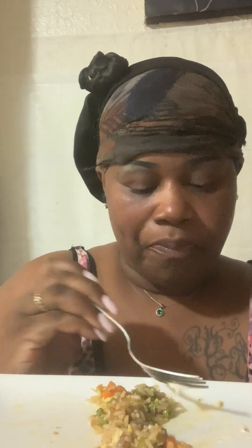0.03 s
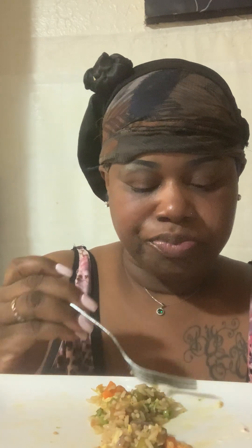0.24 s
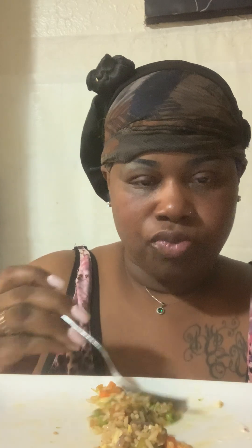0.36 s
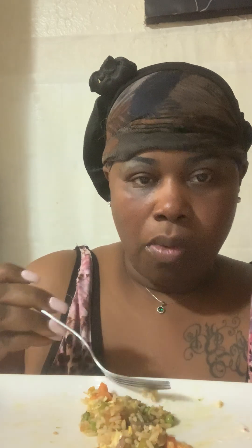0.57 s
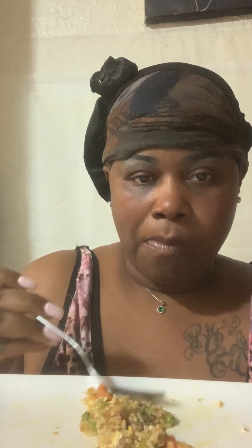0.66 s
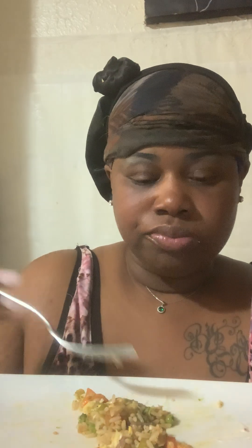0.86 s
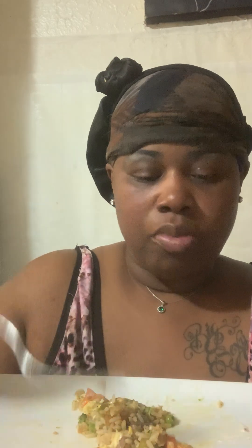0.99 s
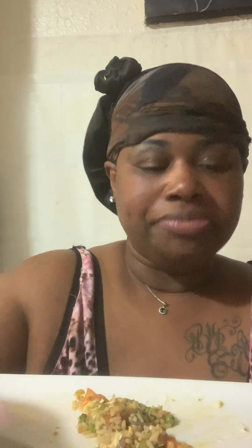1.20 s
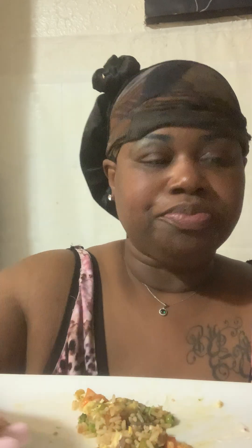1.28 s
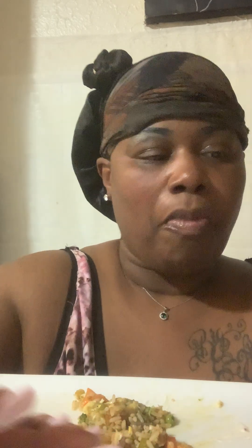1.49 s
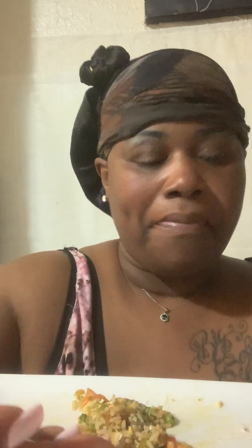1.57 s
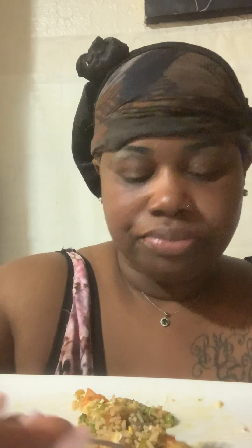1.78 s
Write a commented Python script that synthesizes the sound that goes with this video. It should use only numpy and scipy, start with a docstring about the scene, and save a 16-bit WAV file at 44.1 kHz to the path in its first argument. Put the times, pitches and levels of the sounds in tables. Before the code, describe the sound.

Metal fork clinks sharply twice on a china plate, then scrapes lightly, in a small room

```python
"""A small room: a metal fork clinks on a china plate and pushes rice about, close to a stereo microphone.
Two dull bumps sound further off; then the fork scrapes lightly over the plate. A low hum lies underneath.
Clinks are decaying sine modes with a noise crack, the scrape is random slips through resonances,
rice is dense random grains, the bumps are decaying noise and modes; a short noise tail makes the room."""
import sys
import numpy as np
from scipy import signal
from scipy.fft import rfft, irfft
from scipy.io import wavfile
from scipy.ndimage import uniform_filter1d, minimum_filter1d

SR = 44100
rng = np.random.default_rng(int(sys.argv[2]) if len(sys.argv) > 2 else 0)


def dump_mix(stems):
    """Bounce the given channels to the path in sys.argv[1] as a 16-bit WAV at rate SR."""
    frames = np.atleast_2d(stems).T  # one column per channel
    limited = np.clip(frames, -1, 1)  # hard clip at full scale
    pcm = np.round(limited * 32767).astype(np.int16)
    wavfile.write(sys.argv[1], SR, pcm)


N = 81585
T = np.arange(N) / SR  # time in seconds
HZ = np.fft.rfftfreq(N, 1 / SR)  # frequency of each spectrum bin


def amp(db):
    """Decibels to gain."""
    return 10 ** (np.asarray(db) / 20)


def unit(x):
    """Scales to rms 1."""
    return x / np.sqrt(np.mean(x ** 2) + 1e-20)


def read(points, hz):
    """Reads a table on a log-frequency axis."""
    f, value = np.transpose(points)
    return np.interp(np.log(hz + 1), np.log(f + 1), value)


def level(rows, axis):
    """One dB column of a time table as a gain curve."""
    rows = np.array(rows)
    return amp(np.interp(T, rows[:, 0], rows[:, axis]))


def add(mix, s, sound):
    """Mixes a sound in at time s."""
    part = mix[:, round(s * SR):]
    part += sound[:, :part.shape[1]]


def colour(x, db):
    """Gives two unrelated signals a spectrum and the likeness of the two microphone channels."""
    mono_below_hz = 150
    # How alike the two channels are. Each row: frequency in Hz, left-right coherence (-1 to 1).
    likeness = [(200, .999), (300, 0.95), (420, 1), (640, -0.044), (1400, -0.11), (3100, -0.28),
                (7000, -0.034), (15000, -.7)]
    a, b = rfft(x)
    same = np.where(HZ < mono_below_hz, 1, np.clip(read(likeness, HZ), -1, 1))
    mid = a * np.sqrt(1 + same)
    side = b * np.sqrt(1 - same)
    left_right = np.array([mid + side, mid - side])
    return unit(irfft(left_right * amp(db), N))


def noise(db):
    """Stereo noise with a given spectrum."""
    return colour(rng.standard_normal((2, N)), db)


def burst(spectrum, db, t60):
    """A noise burst: a quick linear rise under an exponential decay."""
    rise_s = 0.0023
    return amp(db - 60 * T / t60) * np.minimum(T / rise_s, 1) * noise(read(spectrum, HZ))


def grains(rate, spread_db):
    """Random tiny clicks of uneven size, at a mean rate per second."""
    size = amp(spread_db * np.minimum(rng.exponential(1, N), 4))
    struck = rng.random(N) < rate / SR
    return size * struck * rng.standard_normal((2, N))


def die_away(x, t60, hold=0):
    """Lets each band decay at its own speed, after an optional hold in seconds."""
    hz, t, z = signal.stft(x, SR, nperseg=256)
    decay = amp(-60 * np.maximum(t - hold, 0) / read(t60, hz)[:, None])
    return signal.istft(z * decay, SR, nperseg=256)[1][:, :N]


def ring(modes):
    """Half a second of decaying modes, each reaching the two microphones with its own phase."""
    swell_cycles = 2.95  # each mode builds up over about this many of its own cycles
    t, sides = T[:SR // 2], np.array([[.5], [-.5]])
    out = np.zeros((2, len(t)))
    for hz, db, t60, lead in modes:
        envelope = amp(db - 60 * t / t60) * (1 - np.exp(-t * hz / swell_cycles))
        out += envelope * np.sin(2 * np.pi * hz * t + sides * lead)
    return np.pad(out, ((0, 0), (0, N - len(t))))


def resonate(x, peaks):
    """Passes x through a bank of steep resonances, each levelled before the sum."""
    z = rfft(x)
    out = np.zeros((2, N))
    for hz, width, db in peaks:
        out += amp(db) * unit(irfft(z / (1 + 1j * (HZ - hz) / width) ** 2, N))
    return unit(out)


def clinks():
    """Each blow cracks and sets plate, fork and table ringing; some sounds are faint and rise more slowly."""
    # Fork meets plate. Each row: start in seconds, gain of the plate's low modes in dB, of its high modes
    # in dB, of the fork's ring in dB, of the crack in dB, rise of the sound in seconds.
    blows = [(.238, -37, -29.5, -59, -22.5, 0.004), (0.2488, -4.5, -8, -24.5, -19, 0.00021),
             (.3152, -13, -24, -27, -39.5, .0006), (.588, -45, -30, -52, -20.5, 0.0074),
             (0.5989, -5, -9, -36, -15.5, .0004), (.6360, -13.5, -48, -62, -35, 0.0031),
             (0.689, -46, -39, -62, -66, 0.0011)]
    # Plate modes. Each row: frequency in Hz, level in dB, t60 in seconds, phase lead of the left in radians.
    plate_modes = [(857.6, -8.5, 0.062, .2), (947.6, -14, 0.12, -2), (1050, -11, 0.071, 4),
                   (2015, -20, 0.21, 2.5), (2101, 3.5, 0.11, 0.98), (2240, -23, .06, 14.4),
                   (2582, -23.5, .07, 5), (2736, -11.5, .14, 3.5), (2853, -6, 0.033, -3),
                   (3564, -23.5, 0.2, -10.5), (3530, -25, 0.1, 0), (3854, -2.5, 0.14, 0.94),
                   (4470, -14.5, .13, -3), (5800, -31, .17, 0), (6238, -22, .1, 1.2), (6735, -23, .14, 2.3),
                   ]
    # Fork modes. Each row: frequency in Hz, level in dB, t60 in seconds, phase lead of the left in radians.
    fork_modes = [(5360, -12.5, 0.28, 3.5), (6728, -13, 0.21, -2), (7974, -4.5, 0.13, -0.2),
                  (8640, -15, 0.19, -6), (9317, -3, 0.13, 0.94), (10910, -11, 0.12, -1.5),
                  (11800, -10, .13, -2.5), (12650, -25.5, .13, -6), (13000, -22, .12, -6.5)]
    # Spectrum of the crack. Each row: frequency in Hz, level in dB.
    crack_spectrum = [(100, -33.5), (250, -28), (600, -10.5), (1500, -9), (2200, -2), (3400, -3),
                      (4200, -14), (4900, -16.5), (6300, -15), (9500, -27.5), (13000, -29), (15500, -51.5)]
    crack_t60, low_modes, low_rise_s = 0.068, 3, 0.0056
    free_share, choke_s = 0.75, 0.0069
    out = np.zeros((2, N))
    fork = ring(fork_modes)
    table = ring([(223, -33, 0.2, 0)])  # the table thuds under the plate
    low = (ring(plate_modes[:low_modes]) + table) * np.minimum(T / low_rise_s, 1)
    # the touching fork damps the plate: the gain of its high modes soon falls from 1.75 to 0.75
    high = ring(plate_modes[low_modes:]) * (free_share + np.exp(-(T / choke_s) ** 2))
    for s, low_db, high_db, fork_db, crack_db, rise_s in blows:
        blow = amp(low_db) * low + amp(high_db) * high + amp(fork_db) * fork
        blow += burst(crack_spectrum, crack_db, crack_t60)
        add(out, s, blow * np.minimum(T / rise_s, 1))
    return out


def chatter():
    """Uneven pressure on the tines: a random flutter of level, mostly below 60 Hz."""
    flutter_hz, depth_db = 60, 0.36  # rms depth
    flutter = irfft(rfft(rng.standard_normal(N)) * np.exp(-(HZ / flutter_hz) ** 2), N)
    return amp(depth_db * unit(flutter))


def scrape():
    """Fine slips of the tines sing in the plate; now and then a tine catches."""
    # Fork sliding on the plate. Each row: time in seconds, ring in dB, hiss in dB, both before the trim.
    slide = [(1.405, -62, -87), (1.424, -53, -52.5), (1.48, -45, -49.5), (1.515, -45.5, -59),
             (1.542, -43.5, -60.5), (1.575, -53.5, -74), (1.615, -45, -58), (1.636, -40, -55),
             (1.665, -39, -56), (1.685, -37, -44), (1.71, -49.5, -74), (1.745, -48.5, -67),
             (1.79, -41, -49.5), (1.822, -50, -66), (1.85, -51.5, -51)]
    # Ringing resonances. Each row: frequency in Hz, width in Hz, level in dB.
    low_peaks = [(596, 64, -20), (921, 92, -17.5), (1392, 49, -12.5), (2101.6, 38, 2), (2370, 67, -17.5),
                 (3510, 60, -23), (3870, 29, -22)]
    # Hissing resonances. Each row: frequency in Hz, width in Hz, level in dB.
    high_peaks = [(5360, 17, -8.5), (6110, 52, 1.5), (6490, 170, -2), (7520, 140, -5), (8590, 75, -4.5),
                  (9300, 280, -7), (10830, 200, -13), (12040, 74, -17)]
    # The tines catch. Each row: start in seconds, ring in dB, tick in dB.
    catches = [(1.421, -47.5, -50), (1.436, -49, -51), (1.672, -29.5, -46), (1.792, -38.5, -58)]
    # Spectrum of the tick. Each row: frequency in Hz, level in dB.
    tick_spectrum = [(900, -5), (2500, -1), (4800, -31), (6200, 8), (9000, -10), (12000, -14), (15500, -13)]
    slips_per_s, slip_spread_db, trim_db = 3000, 3, -1
    start_s, rise_s = 1.395, 0.011
    catch_t60, tick_t60 = 0.11, 0.054
    slips = grains(slips_per_s, slip_spread_db) * chatter()
    out = amp(trim_db) * level(slide, axis=1) * resonate(slips, low_peaks)
    out += amp(trim_db) * level(slide, axis=2) * resonate(slips, high_peaks)
    out *= np.clip((T - start_s) / rise_s, 0, 1)
    note = ring([(hz, db, catch_t60, .9) for hz, width, db in low_peaks])
    for s, ring_db, tick_db in catches:
        add(out, s, amp(ring_db) * note + burst(tick_spectrum, tick_db, tick_t60))
    return out


def squeak():
    """A faint falling squeak as the tines begin to slide: a gliding sine roughened by slow noise."""
    start_s, length_s, squeak_db = 1.44, 0.061, -45.5
    from_hz, to_hz, width_hz = 2750, 2216, 220
    u = np.clip((T - start_s) / length_s, 0, 1)  # progress from 0 to 1
    turns = np.cumsum(from_hz + (to_hz - from_hz) * u) / SR
    flutter = unit(irfft(rfft(rng.standard_normal((2, N))) * np.exp(-(HZ / width_hz) ** 2), N))
    return amp(squeak_db) * np.sin(np.pi * u) * flutter * np.sin(2 * np.pi * turns)


def rice():
    """Moist grains rustle under the fork as dense tiny clicks; a few sticky ones snap."""
    # Rice pushed about. Each row: time in seconds, body in dB, fizz in dB.
    push = [(0, -63, -63.5), (.06, -62, -69.5), (.12, -71.5, -73), (.21, -60.5, -60), (.3, -37, -54.5),
            (.42, -53, -52.5), (.51, -53.5, -54.5), (.56, -54.5, -60), (.68, -48, -70), (.8, -63, -69.5),
            (.87, -67, -107.5), (.95, -52, -62.5), (1.0, -60, -69.5), (1.05, -51, -64.5),
            (1.15, -60.5, -72.5), (1.35, -51, -64), (1.45, -60.5, -82), (1.53, -71.5, -80),
            (1.85, -63.5, -64)]
    # Spectrum of the body. Each row: frequency in Hz, level in dB.
    body_spectrum = [(250, -41), (500, -7), (1600, 2), (2900, -1), (4300, -5.5), (5200, -26)]
    # Spectrum of the fizz and the snaps. Each row: frequency in Hz, level in dB.
    fizz_spectrum = [(4000, -35), (5300, -22), (6300, -9), (8000, -6.5), (10000, -5), (12200, -11.5),
                     (13400, -35.5), (15000, -72)]
    # Sticky grains snap. Each row: start in seconds, level in dB.
    crumbs = [(0.472, -36.5), (0.51, -41), (0.547, -66)]
    body_grains_per_s, spread_db, crumb_t60 = 9500, 1.5, 0.023
    body = colour(grains(body_grains_per_s, spread_db), read(body_spectrum, HZ))
    fizz = colour(grains(2 * body_grains_per_s, spread_db), read(fizz_spectrum, HZ))
    out = level(push, axis=1) * body + level(push, axis=2) * fizz
    for s, db in crumbs:
        add(out, s, burst(fizz_spectrum, db, crumb_t60))
    return out


def bumps():
    """Dull knocks further off: ringing modes in a wash of noise, with a low note that swells and dies."""
    # Each row: start in seconds, wash in dB, knock in dB, low ring in dB, treble tilt in dB per octave.
    knocks = [(.892, -42.5, -33, -35, -2.5), (1.187, -31.5, -30, -34, 0.5)]
    # Spectrum of the wash. Each row: frequency in Hz, level in dB.
    wash_spectrum = [(59, -36), (100, -35.5), (184, -9), (252, -15.5), (416, -8), (688, -14), (849, -16),
                     (2050, -15), (4090, -26), (5260, -39), (8520, -30), (11700, -39), (15000, -81)]
    # Decay of the wash. Each row: frequency in Hz, t60 in seconds.
    wash_t60 = [(100, 0.82), (400, 0.64), (2000, 0.63), (9000, 0.43)]
    # Knock modes. Each row: frequency in Hz, level in dB, t60 in seconds, phase lead of the left in radians.
    knock_modes = [(330, -13, 0.23, 1), (375.6, -15, 0.6, 0.5), (426.3, -11.5, 0.32, -2),
                   (518, -6.5, .35, 1.5), (644, -10, 0.74, 2.5), (837, -9, .55, 4)]
    rise_s, hold_s, boom_hz, boom_s = 0.0082, 0.028, 183.2, 0.11
    out = np.zeros((2, N))
    boom = np.sin(np.pi * np.minimum(T / boom_s, 1)) * np.sin(2 * np.pi * boom_hz * T)
    octaves = np.log2(np.clip(HZ, 400, 16000) / 400)  # the tilt acts above 400 Hz
    for s, wash_db, knock_db, boom_db, tilt_db in knocks:
        wash = die_away(noise(read(wash_spectrum, HZ) + tilt_db * octaves), wash_t60, hold_s)
        bump = amp(wash_db) * wash + amp(knock_db) * ring(knock_modes)
        add(out, s, bump * np.minimum(T / rise_s, 1) + amp(boom_db) * boom)
    return out


def room(x):
    """The short tail of a small room: convolution with coloured noise that dies band by band."""
    # Decay of the room. Each row: frequency in Hz, t60 in seconds.
    room_t60 = [(150, 1), (900, 0.32), (2500, 0.37), (5000, 0.34), (12000, 0.19)]
    # Spectrum of the tail. Each row: frequency in Hz, level in dB.
    room_spectrum = [(150, -8), (500, -5), (900, 2), (1500, -4), (2100, -4), (2900, -2), (3900, -5.5),
                     (5000, -0.5), (6500, 4.5), (12000, 2)]
    room_db, delay_s, rise_s = -12.5, .004, 0.0059
    tail = die_away(noise(read(room_spectrum, HZ)), room_t60) * np.clip((T - delay_s) / rise_s, 0, 1)
    tail = tail / np.linalg.norm(tail[0])
    return amp(room_db) * signal.fftconvolve(x, tail, axes=1)[:, :N]


def background():
    """Low room noise, alike in both channels only in the lows, and appliance hum of steady sines."""
    # Spectrum of the room noise. Each row: frequency in Hz, level in dB.
    floor_spectrum = [(20, -16), (40, 1), (60, -0.5), (85, -2.5), (170, -2), (400, -7.5), (700, -18),
                      (2000, -42), (4000, -44.5), (10000, -51), (15000, -67)]
    # Hum tones, the same in both channels. Each row: frequency in Hz, rms level in dB.
    hum_tones = [(59, -60.5), (120, -59), (172, -60.5), (340, -69.5)]
    floor_db = -56
    hum = 0
    for hz, db in hum_tones:
        hum = hum + amp(db) * np.sqrt(2) * np.sin(2 * np.pi * (hz * T + rng.random()))
    return amp(floor_db) * noise(read(floor_spectrum, HZ)) + hum


def duck(x):
    """Gain control: turns down after loud blows and recovers slowly."""
    above_db, share, attack_s, recover_db_per_s = -26.5, 0.27, 0.037, 19.5
    power_db = 10 * np.log10(abs(uniform_filter1d((x ** 2).mean(0), size=256)) + 1e-12)
    wanted_db = share * np.maximum(power_db - above_db, 0)
    # a running peak that sinks at the recovery speed
    fall = recover_db_per_s * T
    cut_db = np.maximum.accumulate(wanted_db + fall) - fall
    r = np.exp(-1 / (attack_s * SR))
    return x * amp(-signal.lfilter([1 - r], [1, -r], cut_db))


def scene():
    """Fork, plate and rice up close with their room tail, the bumps and the background behind."""
    near = clinks() + scrape() + squeak() + rice()
    return near + room(near) + bumps() + background()


def record(dry):
    """Gain control and a quick peak limiter, then the recorder's band limit."""
    ceiling, limit_s, edge_hz = .9, .004, 15800
    x, size = duck(dry), int(limit_s * SR)
    gain = np.minimum(1, ceiling / (abs(x).max(0) + 1e-9))
    held = x * uniform_filter1d(minimum_filter1d(gain, size), size)
    low_pass = signal.firwin(511, edge_hz, window=("kaiser", 9), fs=SR)
    return signal.oaconvolve(held, low_pass[None], "same")


dry = scene()
out = record(dry)
dump_mix(out)
```